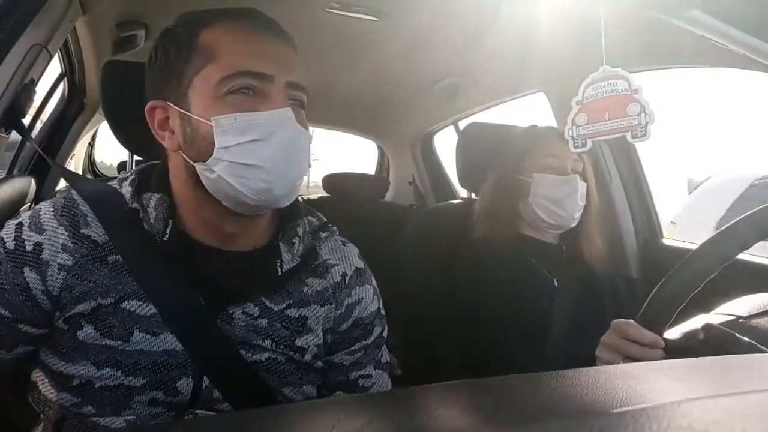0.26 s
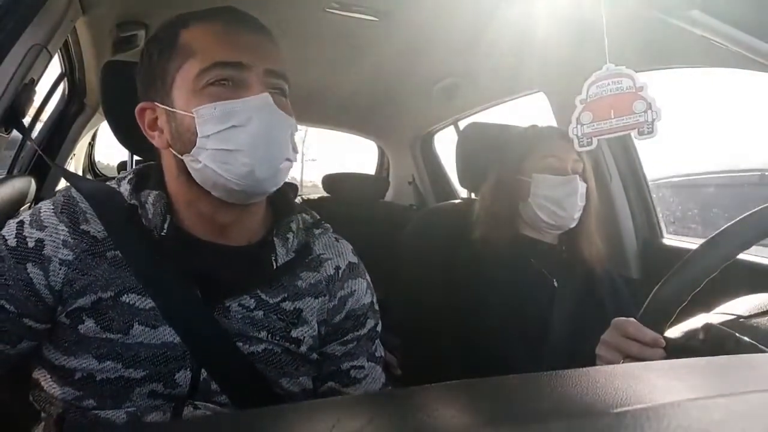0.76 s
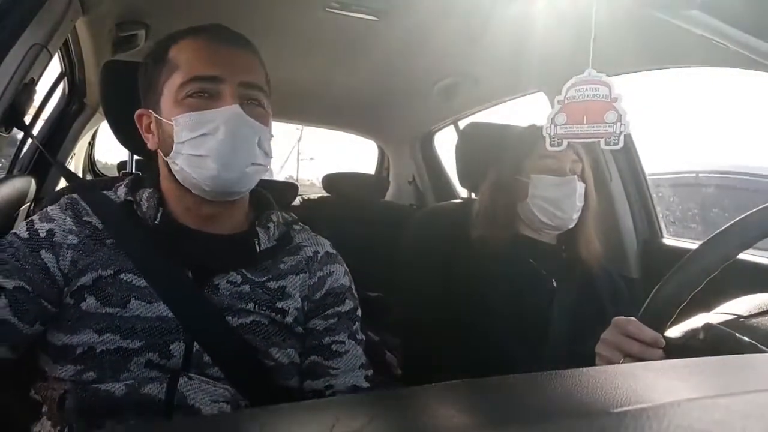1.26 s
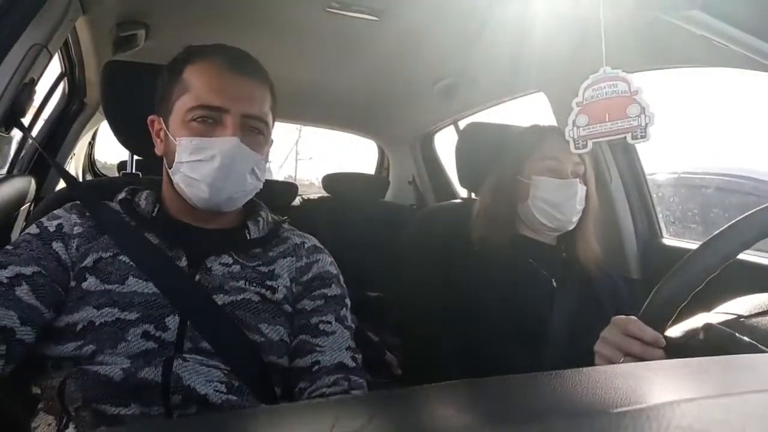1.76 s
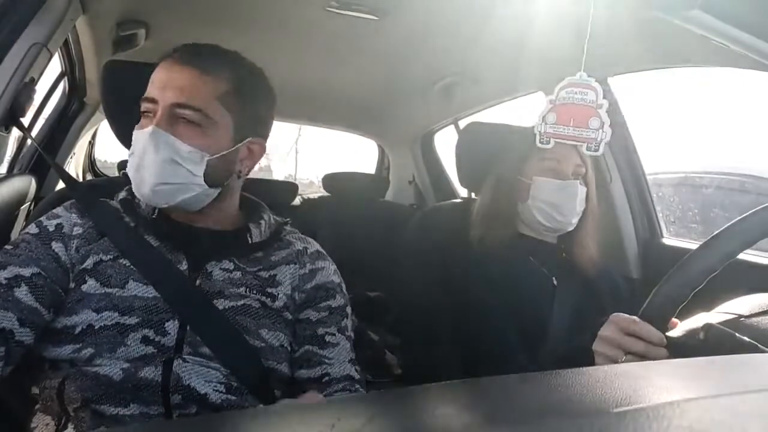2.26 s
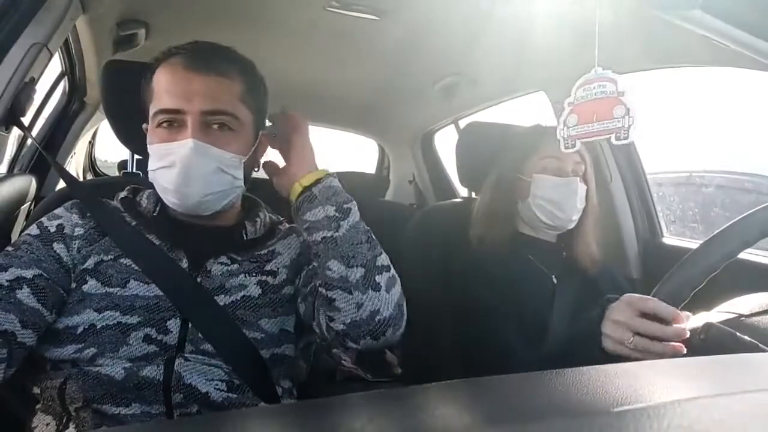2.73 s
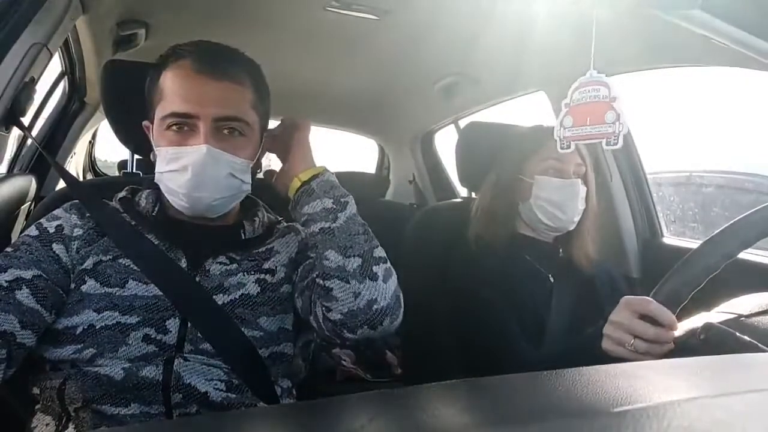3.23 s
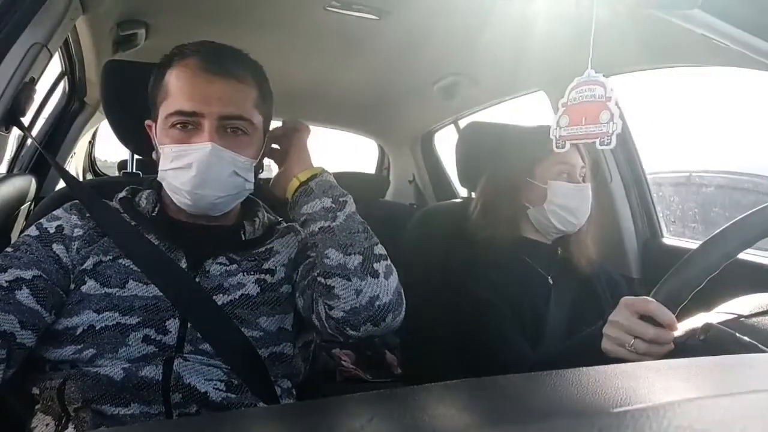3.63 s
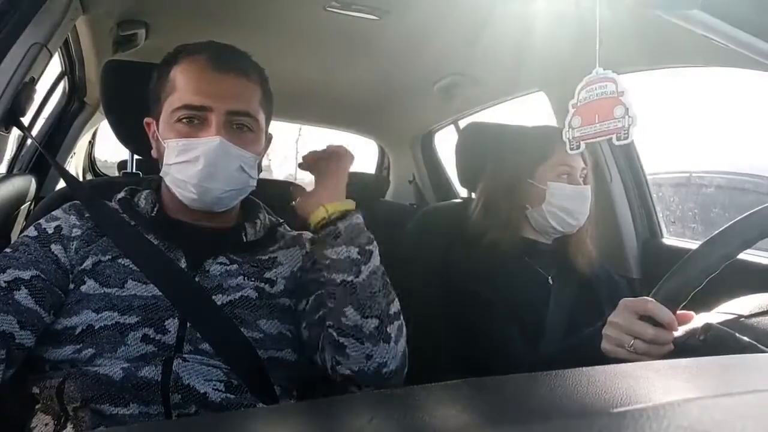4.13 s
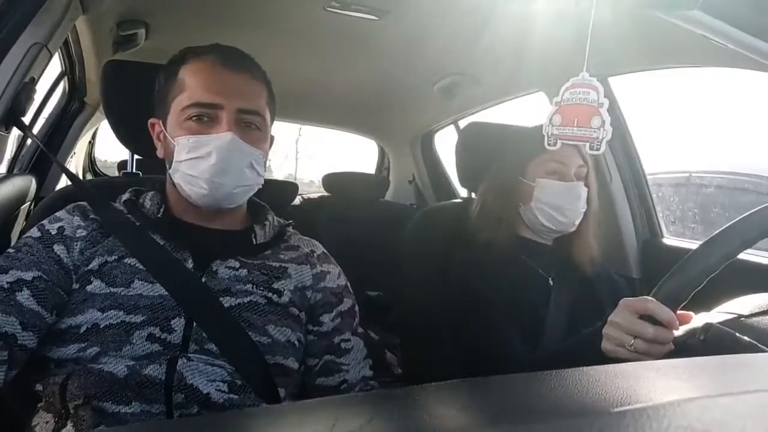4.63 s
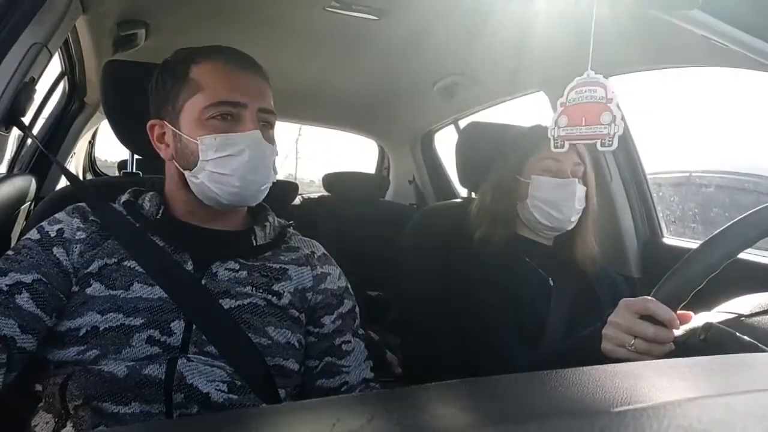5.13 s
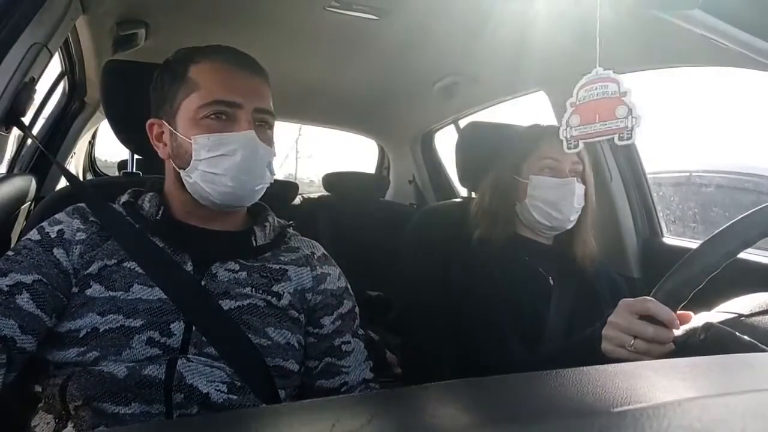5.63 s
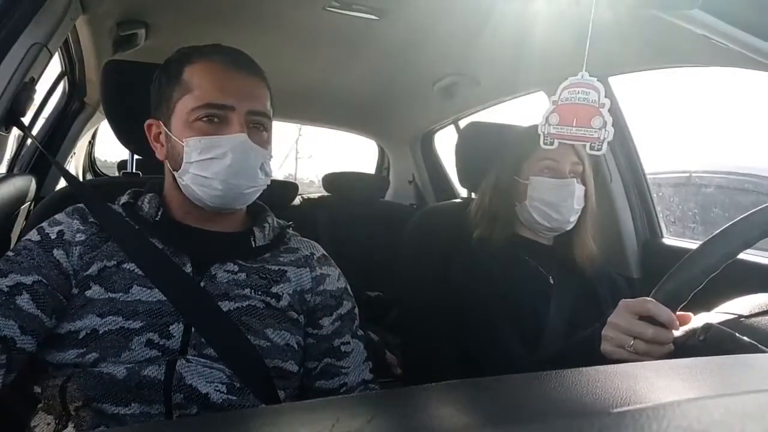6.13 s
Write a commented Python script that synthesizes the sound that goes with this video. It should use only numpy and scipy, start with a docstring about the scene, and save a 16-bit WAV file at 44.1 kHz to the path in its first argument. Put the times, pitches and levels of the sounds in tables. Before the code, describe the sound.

Stereo sound inside a small closed diesel car. From 0 to 1.5 s, low booming tyre rumble and muffled road roar dominate, strongest at the very start, with dull panel thuds from bumps until about 2 s. Engine speed sinks gently beneath. Between 1.4 and 2 s a faint, very high brake tone sings in broken, wavering catches, lifting slightly at the end; at 2.05 s a short low stuttering grunt marks the stop. Road noise fades quickly, and the engine settles into a steady low throb of about 22 pulses per second, its soft knocks growing clearer towards 4.6 s, with faint whine and light ticks. Jacket cloth brushes around 2.1 and 2.75-4.5 s; papery finger rubs scratch at 2.9-3.8 s, with a tiny squeak at 3.2 s. A dry double snap clicks at 4.06 s. Soft low booms swell near 3.4 and 4.7-5 s. Idle and faint hiss continue to 6.4 s.

```python
"""Small diesel car braking to a halt

Heard from inside the cabin by a pair of microphones: tyre noise, filtered from random noise, booms and dies away.
A brake sings as a thin wavering tone, then grunts; decaying modes ring as the body jolts over bumps.
The engine throbs in firing orders and knocks in puffs of noise behind the dashboard, settling to idle.
Shaped noise makes a jacket sleeve, fingers on a paper mask and one small double snap close by, over faint hiss.
"""
import sys
import numpy as np
from scipy import signal
from scipy.fft import rfft, irfft
from scipy.io import wavfile
from scipy.ndimage import uniform_filter1d

SR = 44100
rng = np.random.default_rng(int(sys.argv[2]) if len(sys.argv) > 2 else 0)


def materialize(psi):
    """Save the field psi as 16-bit PCM at rate SR to the path in sys.argv[1].

    A 1-D psi becomes a single channel; in a 2-D psi each row is a channel.
    """
    bounded = np.clip(np.atleast_2d(psi).T, -1, 1)
    quanta = np.round(bounded * 32767).astype(np.int16)
    wavfile.write(sys.argv[1], SR, quanta)


N = 281799
TIME = np.arange(N) / SR   # s
BINS = np.maximum(np.arange(N // 2 + 1) * SR / N, 1)   # Hz


def from_db(db):
    """Decibels to gain."""
    return 10 ** (np.asarray(db) / 20)


def rms_one(x):
    """Scale to unit power."""
    return x / np.sqrt(np.mean(x ** 2) + 1e-20)


def steadied(x, size=SR // 8):
    """Even out the slow chance swells of a narrow-band noise; size is the averaging span in samples."""
    power = uniform_filter1d(np.mean(x ** 2, axis=0), size)
    return x / np.sqrt(power + 1e-9)


def in_time(rows):
    """Each column of a curve at every sample."""
    s, *columns = np.transpose(rows)
    return [np.interp(TIME, s, column) for column in columns]


def over_hz(points):
    """A table read at every frequency bin, on a logarithmic frequency scale."""
    hz, value = np.transpose(points)
    return np.interp(np.log(BINS), np.log(hz), value)


def drift(rate_hz):
    """Slow chance wandering with spread 1: low-passed noise drawn every 100 samples."""
    r = np.exp(-200 * np.pi * rate_hz / SR)
    noise = rng.standard_normal(N // 100 + 1002)
    slow = signal.lfilter([1], [1, -2 * r, r * r], noise)[1000:]
    return np.interp(np.arange(N) / 100, np.arange(len(slow)), rms_one(slow))


def white():
    """Two unrelated noises."""
    return rng.standard_normal((2, N))


def low_pass(hz, order):
    """Gain at every bin of a smooth roll-off above hz."""
    return 1 / np.sqrt(1 + (BINS / hz) ** (2 * order))


def resonances(modes):
    """Response of parallel resonators of alternating sign."""
    response = 0
    for k, (hz, width, db) in enumerate(modes):
        response = response + (-1) ** k * from_db(db) / (1 + 1j * (BINS - hz * hz / BINS) / width)
    return response


def bursts(rows, attack_s, release_s):
    """Gain for rows of (start_s, length_s, level_db): rise, hold, fall at 60 dB per release; powers add."""
    power = 0
    for s, length, db in rows:
        rise = np.clip((TIME - s) / attack_s, 0, 1)
        fall = np.clip((TIME - s - length) / release_s, 0, 2)
        power = power + (rise * from_db(db - 60 * fall)) ** 2
    return np.sqrt(power)


def during(firings, share, half):
    """A soft window, open once in every firing around a share of the cycle."""
    away = (firings - share + .5) % 1 - .5
    return np.exp(-np.square(np.square(away / half)))


def glide(pitch, waver_hz, flutter_db):
    """One wavering tone that follows rows of (time_s, pitch_hz); rms about 1."""
    pitch_hz = in_time(pitch)[0] + waver_hz * drift(36.9)
    turn = 2 * np.pi * np.cumsum(pitch_hz) / SR
    return np.sqrt(2) * from_db(flutter_db * drift(40)) * np.sin(turn)


def struck(events, modes, scatter_db):
    """Each blow rings every mode with a strength of its own; a cushioned blow reaches the high ones less."""
    out = np.zeros(N)
    age = TIME[:SR // 4]
    for s, strength_db, rise_s in events:
        at = round(s * SR)
        cushion = 1 - np.exp(-age / rise_s)
        for k, (hz, db, t60) in enumerate(modes):
            level_db = strength_db + db + scatter_db * rng.standard_normal() - 60 * age / t60
            reach = 1 / (1 + (hz * rise_s / 2) ** 2)
            ring = np.sin(2 * np.pi * hz * age)
            out[at:at + len(age)] += (-1) ** k * reach * cushion * from_db(level_db) * ring
    return out


# likeness of the left and right microphones: pitch_hz, likeness (correlation, -1 to 1)
LIKENESS = [(60, 0.96), (150, .96), (280, 0.93), (420, 0.71), (560, 0.69), (680, -0.45), (800, -0.71),
            (920, -0.38), (1200, 0.14), (1700, 0.1), (2300, 0.05), (3500, 0.08), (5500, 0), (7500, 0.8),
            (13000, 0.93)]


def likeness():
    """Left-right correlation at every bin, kept short of perfect."""
    return np.clip(over_hz(LIKENESS), -.99, .99)


def cabin(drive, response):
    """Coloured drives become the common and opposed parts of the sound at the two microphones; rms 1."""
    alike = likeness()
    mid, side = rfft(drive) * response * np.sqrt([1 + alike, 1 - alike])
    return rms_one(irfft([mid + side, mid - side], N))


# colour of the steady hiss: pitch_hz, level_db (relative, per Hz)
HISS = [(700, 0), (1900, 2), (2700, -.5), (4650, 0), (4900, -11), (6050, -11), (6350, -6.5), (7600, -8),
        (8400, -13), (8800, -22), (11400, -28), (11700, -13), (13300, -9), (15700, -9)]


def hiss():
    """Faint steady noise under everything."""
    return from_db(-63.0) * cabin(white(), from_db(over_hz(HISS)))


ROAD_FADE_FROM_S, ROAD_FADE_DB_PER_S = 1.5, 6


def rolling():
    """The road sounds hold at first, then die away."""
    return from_db(-ROAD_FADE_DB_PER_S * np.maximum(TIME - ROAD_FADE_FROM_S, 0))


# cabin booms under the tyres: pitch_hz, width_hz, level_db (relative)
BOOMS = [(83.5, 23.8, 1), (110.8, 23.4, 1.5), (135.6, 29.8, -0.5), (155.2, 28.8, 1.5), (244.5, 17, -7.5),
         (305.6, 6.2, -9.5)]
# colour of the road roar: pitch_hz, level_db (relative, per Hz)
ROAR = [(25, -57), (60, -13), (120, -4), (190, 3), (310, -0.5), (410, -6), (520, -10), (620, -18),
        (700, -19.5), (1000, -30.5), (1450, -30.5), (1900, -46.5), (4000, -104)]
# rough stretches of road that make the cabin boom: start_s, length_s, level_db
ROUGH_ROAD = [(-.05, 0.31, -26), (.72, 0.2, -40.5), (1.7, 0.33, -42)]
# levels before the slow unevenness
RUMBLE_DB, ROAR_DB = -44.5, -37


def tyres(lumpy_db, low_cut_hz, high_cut_hz):
    """The road shakes the wheels: low cabin booms under a broad roar, both uneven with the surface."""
    fade = rolling()
    shaking = np.hypot(from_db(RUMBLE_DB) * fade, bursts(ROUGH_ROAD, attack_s=0.023, release_s=3.7))
    edges = low_pass(high_cut_hz, 3) / np.sqrt(1 + (low_cut_hz / BINS) ** 6)
    rumble = shaking * steadied(cabin(white(), resonances(BOOMS) * edges))
    roar = from_db(ROAR_DB) * fade * steadied(cabin(white(), from_db(over_hz(ROAR))), size=SR // 20)
    return from_db(lumpy_db * drift(2.0)) * (rumble + roar)


# hum of the tread: pitch_hz, width_hz, level_db (relative)
TREAD = [(1310, 380, 0)]
# ring of the air inside the tyres: pitch_hz, width_hz, level_db (relative)
CAVITY = [(412, 26, 0)]
# starting levels and falls as the car slows; the road fade comes on top
TREAD_DB, TREAD_FADE_DB_PER_S = -61.5, 6
CAVITY_DB, CAVITY_FADE_DB_PER_S = -46.5, 4


def tread():
    """The tread hums on the asphalt and the air in the tyres rings, ever more faintly as the car slows."""
    hum = cabin(white(), resonances(TREAD) * low_pass(2300, 3))
    ring = steadied(cabin(white(), resonances(CAVITY) * low_pass(600, 3)))
    hum_gain = from_db(TREAD_DB - TREAD_FADE_DB_PER_S * TIME)
    ring_gain = from_db(CAVITY_DB - CAVITY_FADE_DB_PER_S * TIME)
    return rolling() * (hum_gain * hum + ring_gain * ring)


# firing orders of the throb: multiple of the firing rate, level_db (rms, before the engine's throb gain)
THROB = [(2, -71), (3, -65), (4, -54.5), (5, -49.5), (6, -52.5), (7, -53.5), (9, -58), (10, -54), (11, -63),
         (12, -57), (13, -57), (14, -55.5), (15, -66), (16, -66), (18, -65), (19, -62), (20, -61.5),
         (21, -62.5), (22, -66), (23, -68), (24, -65)]
# orders swelling on cabin resonances: start_s, length_s, multiple of the firing rate,
# level_db (rms of the added tone, before the engine's throb gain)
SWELLS = [(2.6, .25, 6, -50), (2.95, .12, 6, -50), (3.25, .2, 6, -52), (3.65, .22, 6, -47),
          (4.03, .15, 6, -46), (4.33, .2, 6, -46.5), (3.9, .7, 9, -57), (2.42, .22, 10, -54),
          (2.9, .15, 10, -54), (3.22, .15, 10, -52), (3.55, .14, 10, -50), (5.18, .12, 10, -48.5),
          (5.39, .14, 10, -47), (5.6, .3, 10, -43.5), (5.98, .45, 10, -47)]


def throb(firings, idle_rate, lag, scatter, waver):
    """Low firing orders; the body smears their timing (lag in cycles, scatter and waver in radians)."""
    alike = likeness()
    out = np.zeros((2, N))
    for order, db in THROB:
        turn = 2 * np.pi * order * (firings - lag) + scatter * rng.standard_normal() + waver * drift(3.8)
        # phase between the microphones that gives the likeness at this pitch
        apart = np.arccos(np.interp(order * idle_rate, BINS, alike)) / 2
        swells = [(s, length, swell_db) for s, length, k, swell_db in SWELLS if round(k) == order]
        strength = from_db(db) + bursts(swells, attack_s=.1, release_s=.5)
        gain = np.sqrt(2) * strength * (1 + .6 * waver * drift(2.66))
        out += gain * np.sin([turn + apart, turn - apart])
    return out


# ring of the engine block: pitch_hz, width_hz, level_db (relative)
BLOCK = [(730, 80, -3), (905, 70, -1), (1080, 200, -9), (1270, 110, -6), (1560, 190, -14.5)]
# piston contacts within one firing: share of the cycle, level_db (relative)
CONTACTS = [(.965, 0), (.19, -8), (.79, -8)]
# short ring of those contacts: pitch_hz, width_hz, level_db (relative)
PING = [(836, 90, 0)]
PING_DB = -9.5   # against the rattle
# middle and half length of each burn's rattle, as shares of the cycle
BURN_AT, BURN_HALF = -.04, .19


def knock(firings, between_db, uneven_db):
    """Each burn shakes the block in one even puff of rattle, with the pistons' contacts ringing too."""
    dull = 1 / np.sqrt((1 + (BINS / 1900) ** 8) * (1 + (600 / BINS) ** 6))
    rattle = steadied(cabin(white(), resonances(BLOCK) * dull), size=SR // 120)
    burn = np.hypot(during(firings, BURN_AT, BURN_HALF), from_db(between_db))
    blows = np.zeros(N)
    for share, db in CONTACTS:
        cycle = np.floor(firings - share)
        blows += from_db(db) * np.diff(cycle, prepend=cycle[0])
    quarter_turn = np.array([[1], [1j]])   # the cross-cabin wave is out of step with the lengthwise one
    ping = cabin(blows, resonances(PING) * dull * quarter_turn)
    return (burn * rattle + from_db(PING_DB) * ping) * from_db(uneven_db * drift(14))


# steady whirr of the belt drive: pitch_hz, width_hz, level_db (relative)
WHIRR = [(908, 68, -2.5), (1254, 180, -10), (1550, 220, -11.5), (2250, 250, -15)]


def whirr():
    """The belt drive whirrs as steady resonant noise; rms about 1."""
    return steadied(cabin(white(), resonances(WHIRR) * low_pass(2800, 4)), size=SR // 50)


# valve ticks: share of the cycle, half length in cycles, level_db (at idle)
VALVES = [(.12, .09, -72), (.28, .045, -68.5)]
# ring of the valve cover: pitch_hz, width_hz, level_db (relative)
VALVE_RING = [(2335, 80, 0)]


def valves(firings):
    """Light ticks of the valve gear after each burn ring the valve cover."""
    ticks = sum(from_db(db) * during(firings, share, half) for share, half, db in VALVES)
    return ticks * steadied(cabin(white(), resonances(VALVE_RING) * low_pass(3200, 4)), size=SR // 120)


# colour of the car's irregular shudder: pitch_hz, level_db (relative, per Hz)
SHUDDER = [(20, -28), (40, -23.5), (62, 2.5), (92, 2), (125, 5.5), (170, 1.5), (230, 1.5), (295, 4),
           (345, -0.5), (440, -1.5), (620, -5.5), (700, -14.5), (1250, -22), (1800, -59.5)]


def shudder(firings, lag, depth):
    """Panels and mounts shake irregularly, a little harder after each firing."""
    pulse = 1 + depth * np.cos(2 * np.pi * (firings - lag))
    return steadied(cabin(white() * pulse, from_db(over_hz(SHUDDER))))


# engine speed: time_s, firings per second
SPEED = [(0, 27), (1, 24), (1.9, 22.2), (2.5, 22.08), (3.05, 22.12), (3.7, 22.01), (4.3, 22.18),
         (4.7, 22.02), (5.25, 21.97), (5.7, 22.1), (6.39, 22.0)]
# the knock grows as the engine settles: time_s, level_db
KNOCK = [(1.6, -62), (3.2, -57), (4.6, -55.5)]
# single firings come to stand out: time_s, level_db (rattle left between the burns)
CHUG = [(0, -1), (2, -3), (4.5, -12), (6.39, -12)]
FIRING_AT_S = 4.987   # a moment at which the firing cycle starts
THROB_DB, WHIRR_DB, SHUDDER_DB = 1, -64.5, -41.5
# above idle the orders miss the cabin's resonances: loss for each extra firing per second
THROB_LOSS_DB = 4
# faint whine: centre pitch, and rms level once at idle
WHINE_HZ, WHINE_DB = 896, -68


def engine():
    """A diesel behind the dashboard sinks to idle; its knock, whine and valve ticks grow together."""
    rate, = in_time(SPEED)
    idle_rate = SPEED[-1][1]
    firings = np.cumsum(rate) / SR
    firings = firings - np.interp(FIRING_AT_S, TIME, firings)
    throb_db = THROB_DB - THROB_LOSS_DB * (rate - idle_rate)
    knock_db, = in_time(KNOCK)
    between_db, = in_time(CHUG)
    settled = from_db(knock_db - KNOCK[-1][1])
    whine = from_db(WHINE_DB) * glide([(0, WHINE_HZ)], waver_hz=7, flutter_db=1)
    hum = throb(firings, idle_rate, lag=0.1783, scatter=1.71, waver=0.24)
    return (from_db(throb_db) * hum
            + from_db(knock_db) * knock(firings, between_db, uneven_db=1.0)
            + from_db(WHIRR_DB) * whirr()
            + settled * (whine + valves(firings))
            + from_db(SHUDDER_DB) * shudder(firings, lag=0.14, depth=.2))


# strokes of the jacket sleeve: start_s, length_s, level_db
STROKES = [(-.1, 0.074, -57.5), (.9, 0.59, -67), (2.11, 0.088, -68.5), (2.75, 0.26, -68),
           (3.07, 0.26, -62.5), (3.52, 0.24, -68.5), (3.8, 0.099, -72), (4.25, 0.23, -72)]
# soft brushing while the body shifts: start_s, length_s, level_db
SHIFTING = [(0.29, 4.27, -71)]
# colour of the cloth: pitch_hz, level_db (relative, per Hz)
CLOTH = [(900, -12), (2200, 1), (4600, 0.5), (5000, -8), (6000, -7), (6500, 2), (7500, 2), (8400, -4),
         (8900, -18), (11400, -28), (11800, -12), (15500, -12)]


def jacket(grain_db):
    """Cloth slides over cloth in tiny catches."""
    strokes = bursts(STROKES, attack_s=0.055, release_s=0.48)
    shifting = bursts(SHIFTING, attack_s=0.27, release_s=1.7)
    grains = white() * from_db(grain_db * drift(46))
    return np.hypot(strokes, shifting) * cabin(grains, from_db(over_hz(CLOTH)))


# suspension jolts: time_s, level_db (strength of the blow), rise_s
JOLTS = [(.075, -24, .003), (.14, -24, .003), (.41, -21.5, .003), (.53, -24, .004), (.65, -22, .003),
         (.843, -21, .003), (1.275, -27, .0012), (1.559, -28, .0005), (1.661, -24, .0006),
         (1.739, -23.5, .0005), (1.826, -27, .003), (1.961, -23.5, .005)]
# modes of the body panels: pitch_hz, level_db (relative), t60_s
BODY = [(168, 2, .07), (270, -2.5, .06), (385, -2.5, .04), (520, -16, .025), (750, -21, .025),
        (900, -20, .028), (1120, -23, .026)]


def jolts(low_cut_hz):
    """Bumps ring the body panels; the springs take up their deepest part."""
    springs = signal.butter(2, low_cut_hz, "high", fs=SR, output="sos")
    return signal.sosfilt(springs, struck(JOLTS, BODY, scatter_db=1.0) + 1e-18)


# catches of the singing brake pad: start_s, length_s, level_db (rms)
SQUEALS = [(1.40, 0.02, -64), (1.425, 0.027, -64), (1.483, 0.053, -63.5), (1.565, 0.075, -68),
           (1.672, 0.02, -65), (1.728, 0.13, -62), (1.865, 0.074, -60.5), (1.95, 0.022, -62)]
# the pitch holds, then lifts: time_s, pitch_hz
SQUEAL_PITCH = [(1.84, 7503), (1.97, 7552)]


def squeal():
    """A pad catches and makes its disc sing on one high mode."""
    return bursts(SQUEALS, attack_s=0.012, release_s=0.13) * glide(SQUEAL_PITCH, waver_hz=8.1, flutter_db=1.0)


# grinding as the car settles: start_s, length_s, level_db
GRUNT = [(2.05, 0.13, -47.5)]
# its ring through the suspension: pitch_hz, width_hz, level_db (relative)
GRUNT_RING = [(322, 57, -6), (402, 35, -3)]
# slips of the pads: time_s, level_db (strength of the blow)
SLIPS = [(2.053, -27), (2.087, -29.5), (2.113, -30), (2.145, -30.5)]
# suspension modes each slip rings: pitch_hz, level_db (relative), t60_s
SLIP_RING = [(310, -2.5, .06), (385, -1, .055), (850, -20, .03), (1082, -24, .04)]


def grunt():
    """The pads stick and slip a few times as the wheels come to rest, grinding in between."""
    grinding = steadied(cabin(white(), resonances(GRUNT_RING) * low_pass(520, 3)))
    slips = struck([(s, db, .0012) for s, db in SLIPS], SLIP_RING, scatter_db=2.0)
    return bursts(GRUNT, attack_s=0.015, release_s=0.27) * grinding + slips


# rubs at a paper mask and its ear loop: start_s, length_s, level_db
RUBS = [(2.895, .03, -68), (3.025, 0.035, -61), (3.213, 0.04, -60.5), (3.28, .015, -67), (3.48, .07, -64.5),
        (3.585, .012, -63), (3.64, .04, -67), (3.805, .02, -67)]
# colour of the rubbing: pitch_hz, level_db (relative, per Hz)
PAPER = [(1000, -12), (1700, -1), (2250, 11), (2900, -1), (4200, 7), (5500, -6), (7500, 1), (9000, -18),
         (11400, -35), (12500, -4), (15500, -21)]
# faint squeak of the stretched ear loop: start_s, length_s, level_db (rms)
LOOP_SQUEAK = [(3.21, .045, -69)]
LOOP_HZ = 2232


def fingers(catches_per_s, spread_db):
    """Short rubs of skin on paper, runs of tiny uneven catches, and one squeak of the ear loop."""
    catches = (rng.random(N) < catches_per_s / SR) * from_db(spread_db * rng.standard_normal(N))
    decay = np.exp(-1 / (.0007 * SR))   # each catch's power fades with a 0.7 ms time constant
    power = signal.lfilter([1], [1, -decay], catches ** 2 + 1e-9)
    rubbing = cabin(white() * np.sqrt(power), from_db(over_hz(PAPER)))
    squeak = glide([(0, LOOP_HZ)], waver_hz=12, flutter_db=2)
    return (bursts(LOOP_SQUEAK, attack_s=.015, release_s=.1) * squeak
            + bursts(RUBS, attack_s=0.0097, release_s=0.16) * rubbing)


# swells of a low boom: start_s, length_s, level_db (rms)
LOW_BOOMS = [(3.38, .12, -44.5), (4.72, 0.14, -44), (4.93, .1, -45.5)]
# its downward slides: time_s, pitch_hz
LOW_BOOM_PITCH = [(3.38, 107), (3.6, 89), (4.5, 100), (4.78, 101), (4.98, 94), (5.17, 76)]


def low_boom():
    """A low tone in the standing car slides down and fades."""
    return bursts(LOW_BOOMS, attack_s=0.032, release_s=1.0) * glide(LOW_BOOM_PITCH, waver_hz=5.2, flutter_db=3.5)


# the two ticks of a small snap: time_s, level_db (strength of the blow)
SNAP = [(4.0615, -44.5), (4.0648, -40.5)]
# colour of its noise: pitch_hz, level_db (relative, per Hz)
SNAP_COLOUR = [(600, -20), (1000, -5), (1280, 0), (1700, -5), (2350, -3), (2750, -5), (3300, -3),
               (3900, -14), (4500, -16), (5300, -30), (6900, -19), (9000, -45)]
# its brief ring: pitch_hz, level_db (relative), t60_s
SNAP_RING = [(1245, 0, .026), (2350, -4, .016), (2930, -11, .01), (3400, -13, .008), (4400, -19, .008),
             (6800, -19, .008)]


def snap(crack_db, crack_t60, echo_db, echo_t60):
    """A dry double tick close by with a brief plastic ring and the dense short echoes of the cabin."""
    envelope = np.zeros(N)
    age = TIME[:SR // 8]
    crack = from_db(crack_db - 60 * age / crack_t60)
    echo = from_db(echo_db - 60 * age / echo_t60)
    for s, db in SNAP:
        at = round(s * SR)
        envelope[at:at + len(age)] += from_db(db) * (crack + echo)
    ring = struck([(s, db, .0001) for s, db in SNAP], SNAP_RING, scatter_db=.5)
    noise = cabin(envelope * white(), from_db(over_hz(SNAP_COLOUR)))
    return ring + np.sqrt(np.mean(envelope ** 2)) * noise


def scene():
    """Tyres, brakes, engine and small cabin sounds over a faint hiss."""
    road = tyres(lumpy_db=0.57, low_cut_hz=60, high_cut_hz=1100) + tread() + jolts(low_cut_hz=90)
    car = road + engine() + squeal() + grunt() + low_boom()
    rubbing = fingers(catches_per_s=600, spread_db=3.5)
    tick = snap(crack_db=-9, crack_t60=.01, echo_db=-18, echo_t60=.1)
    return hiss() + car + jacket(grain_db=2.5) + rubbing + tick


# balance of the two microphones: pitch_hz, level_db (left minus right)
LEFT_DB = [(60, 1.5), (125, 1), (250, .2), (500, .3), (1000, 1.8), (2000, 1), (4000, 0), (8000, .6),
           (14000, .2)]
CUTOFF_HZ = 15800


def record(dry):
    """The sound eases in and out over 4 ms, leans a little to the left, and its top is cut steeply."""
    ease = np.clip(np.minimum(TIME, TIME[-1] - TIME) / .004, 0, 1)
    lean = from_db(np.array([[1], [-1]]) * over_hz(LEFT_DB) / 2)
    leaning = irfft(rfft(dry * ease) * lean, N)
    top_cut = signal.ellip(12, .1, 80, CUTOFF_HZ, fs=SR, output="sos")
    return signal.sosfilt(top_cut, leaning)


dry = scene()
out = record(dry)
materialize(out)
```